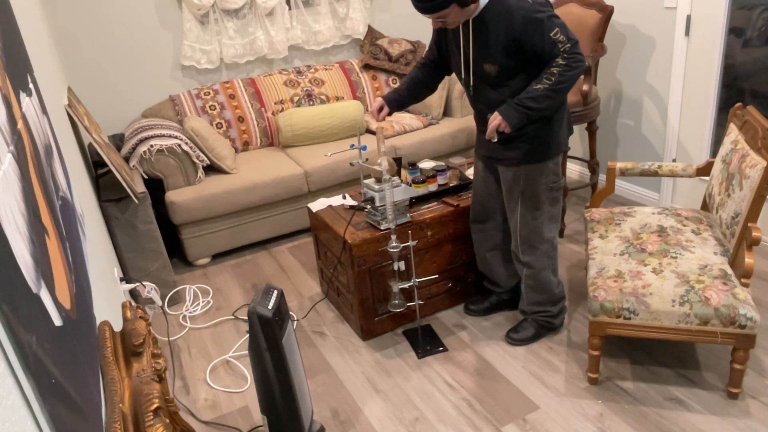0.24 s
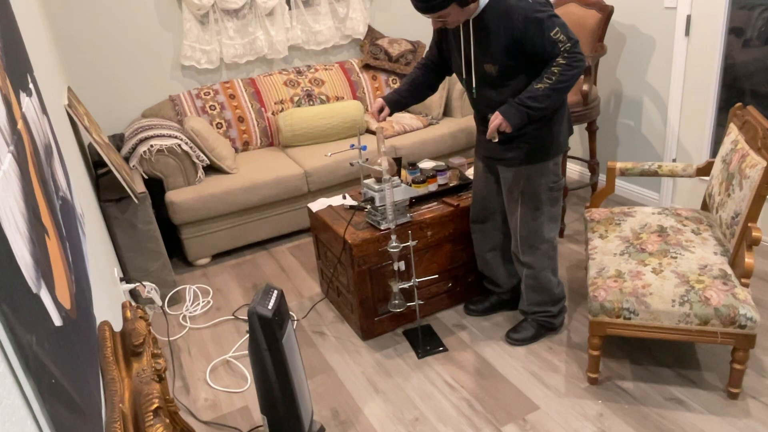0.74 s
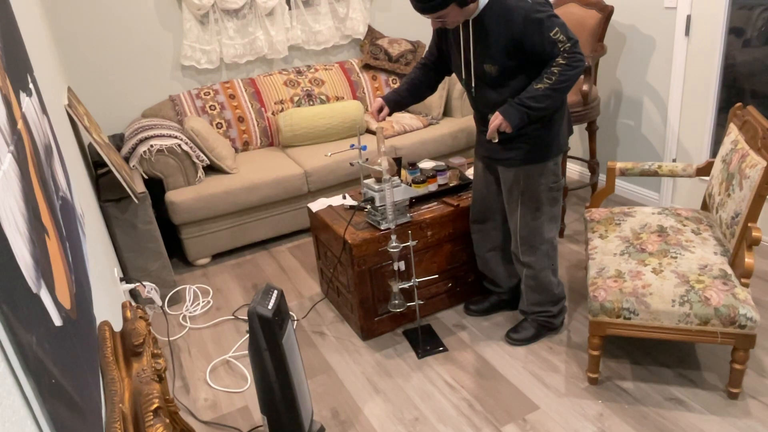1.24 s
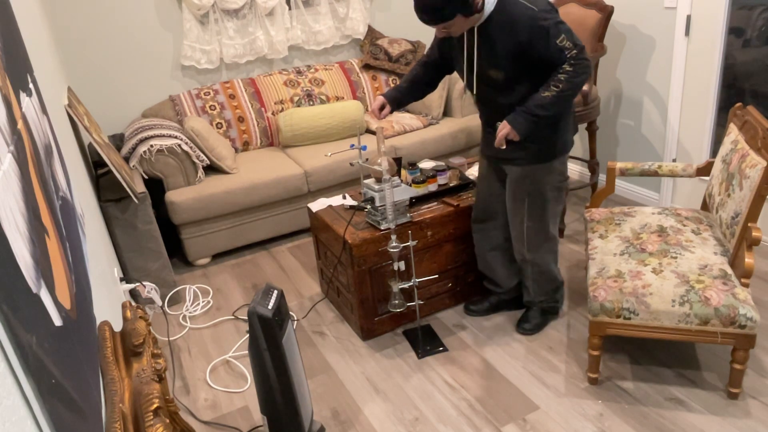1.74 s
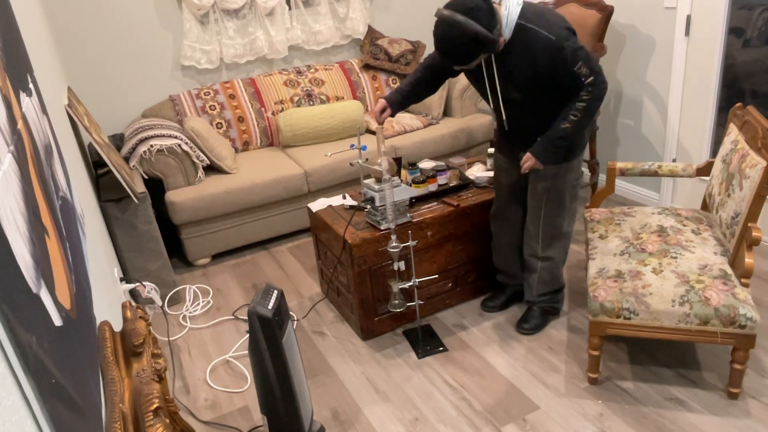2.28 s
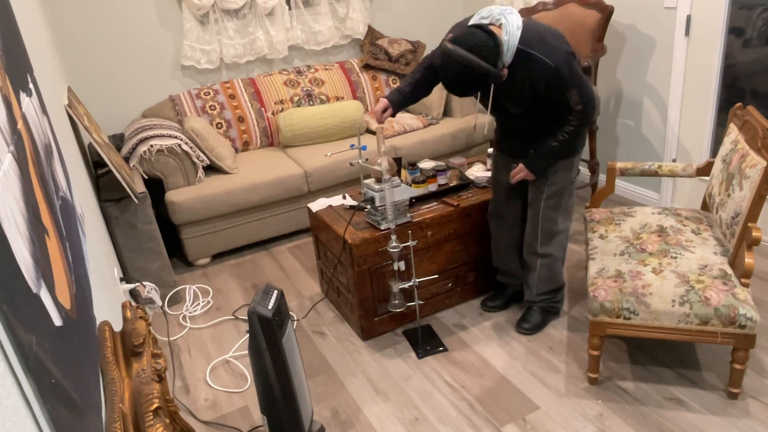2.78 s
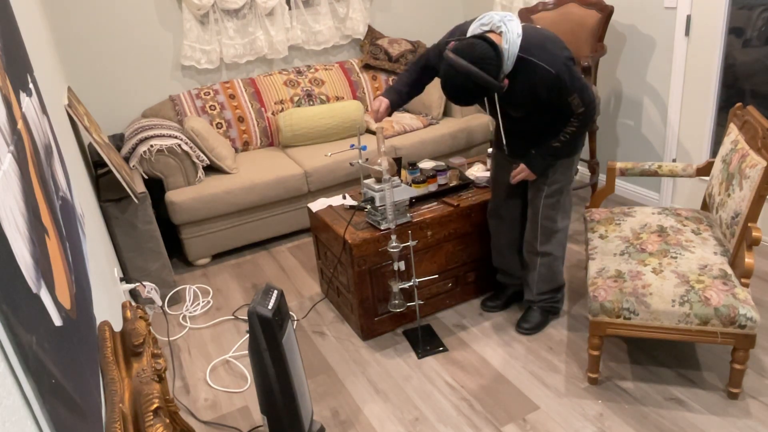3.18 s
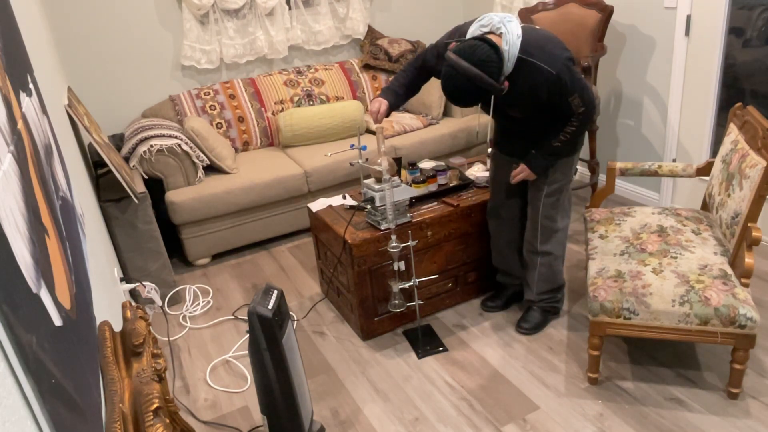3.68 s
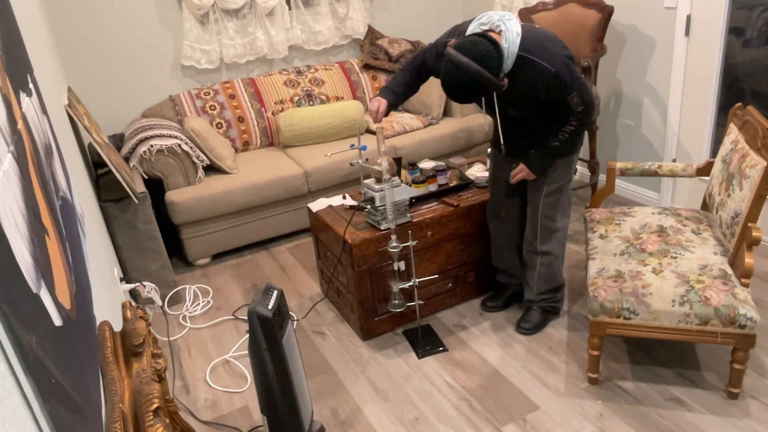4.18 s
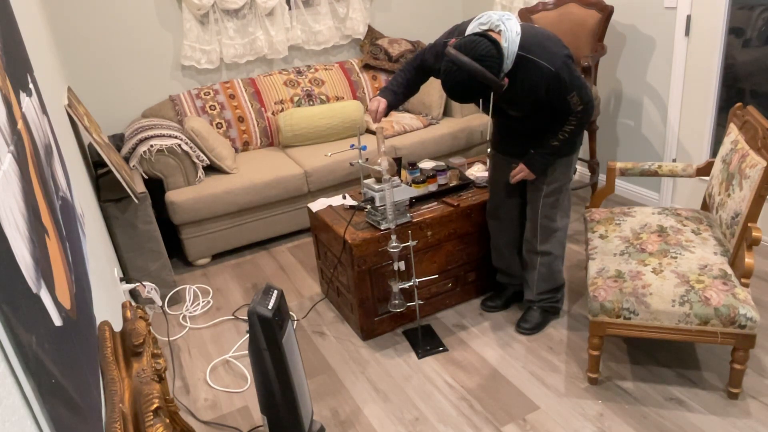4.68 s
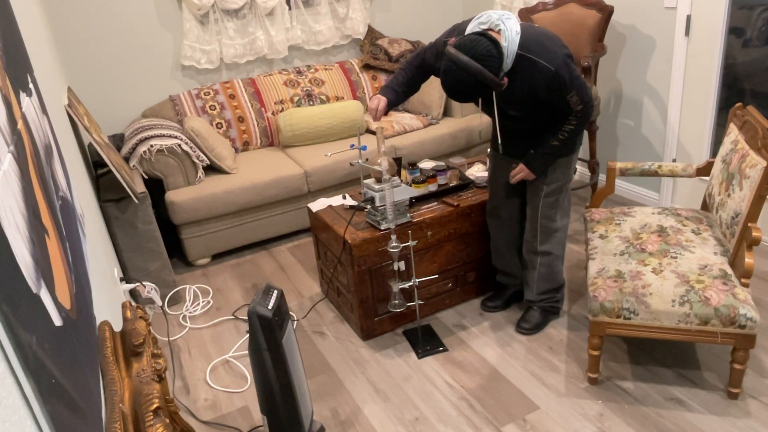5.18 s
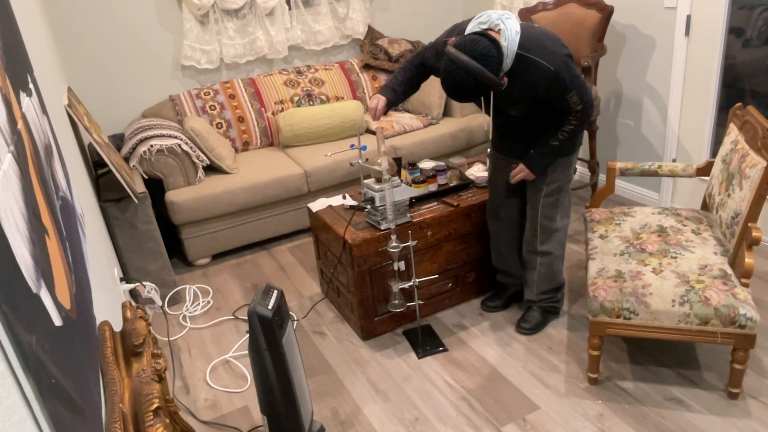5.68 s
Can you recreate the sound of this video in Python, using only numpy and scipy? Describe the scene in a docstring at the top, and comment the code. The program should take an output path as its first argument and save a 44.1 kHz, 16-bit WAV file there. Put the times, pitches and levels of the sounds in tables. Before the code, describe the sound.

A small furnished room picked up in stereo by a phone, with short reverberation, low rumble and faint hiss. From 0 to 1.5 s, clamped glassware gives irregular tiny ticks, some dry and sharp, some chirping, over faint scratchy creaking. A low motor hum near 77 Hz is weak at first, grows from about 1 s and is strongest around 1.5 s, then rises and falls unevenly, with a buzzier edge around 2 to 3 s. At 1.5 and 1.65 s a shoe scuffs briefly, with a soft low thud at 1.7 s; a longer, louder gritty slide swells to about 2.1 s and dies away. Ticks resume at 2.3 s and crowd together from 3 to 3.5 s. From 3.7 to 4.8 s, about nine uneven stir-bar knocks ring the flask, bright, hard and very short, with small rattles; the strongest is near 4.2 s. A faint pulsing whirr lingers. Sparse clicks and light creaking continue to 5.9 s.

```python
"""A magnetic stir bar knocks against a glass flask in a small living room: each blow rings the glass modes.
The glassware ticks and creeps in its clamp by stick-slip, which rings the clamp's modes.
Feet beside it shift: three short scuffs of filtered noise with grit, and a soft low thud.
A motor hums in multiples of its turning rate, swelling and fading; the stirrer whirrs faintly as noise
through two resonances. Rumble and hiss lie beneath, and two phone microphone ports pick it all up."""
import sys
import numpy as np
from scipy import signal
from scipy.fft import rfft, irfft, next_fast_len
from scipy.io import wavfile

SR = 44100
rng = np.random.default_rng(int(sys.argv[2]) if len(sys.argv) > 2 else 0)


def put_to_file(sound):
    """Save the sound as 16-bit audio at rate SR, in the file named by the first command-line argument."""
    columns = np.atleast_2d(sound).T  # one column per channel
    safe = np.clip(columns, -1, 1)
    whole_steps = np.round(safe * 32767)
    wavfile.write(sys.argv[1], SR, whole_steps.astype(np.int16))


N = 261697
TIME = np.arange(N) / SR  # s

# Levels are relative: gains in the functions and the ports may shift them.
# Stir bar blows on the flask: [t/s, strength/dB, favoured f/Hz, emphasis/dB, second f/Hz,
# its emphasis or damping/dB, each bounce against the last/dB, clamp rattle level/dB]
FLASK_KNOCKS = [(3.711, -5.5, 5270, 9, 3580, -5.5, -33, -69),
                (3.8038, -4, 3750, -24, 10300, -10, -14, -67.5),
                (3.9592, -5, 2750, 2.5, 9500, 2.5, -8, -61), (4.2139, 0.5, 2670, 14.5, 3440, 3, -13, -64.5),
                (4.512, -3, 3000, -2.5, 14300, 11, -7, -59), (4.53, -8, 4670, 11.5, 10400, -13, -14, -66.5),
                (4.67, -7, 7400, 12, 10600, -4.5, -8, -67.5), (4.681, -5.5, 10400, -9, 5900, 0, -22, -63.5),
                (4.803, -1, 4440, 3, 2970, 5, -13, -63.5)]
# Modes of the flask: [f/Hz, level/dB, t60/s]
FLASK_MODES = [(2200, -9, 0.018), (2421, -1, 0.037), (2852, -4, 0.062), (2933, -8.5, 0.025),
               (3580, -17.5, 0.034), (3975, -8, 0.039), (4270, 2.5, 0.043), (4335, 2, 0.085),
               (4490, -11, .018), (4900, -5, 0.023), (5820, -13.5, 0.028), (7080, -1.5, 0.06),
               (7430, -8, 0.015), (8400, -0.5, 0.0044), (10400, 9.5, 0.033), (14700, -20, .012),
               (14240, -7.5, 0.039)]
LONGEST_BOUNCE_S = 0.013
# A place of contact favours the modes within about this many octaves
CONTACT_OCTAVES = 0.21

# Slips of the glassware in its clamp: [t/s, strength/dB, favoured f/Hz, emphasis/dB, slip decay/s]
CLAMP_TICKS = [(.18, -6, 3770, 21, 0.022), (.216, -6.5, 3770, 1, 0.01), (.279, 1, 11100, 14.5, 0.0015),
               (.43, -13, 5500, 22, 0.0022), (.461, -18, 5400, 25, 0.0024), (.508, -5, 3470, 17, 0.0085),
               (.688, -16.5, 6060, 29, 0.0014), (.832, -8.5, 620, 35, 0.0026),
               (.937, -16, 5650, 24, 0.0065), (1.029, -2.5, 10350, 19.5, 0.0067),
               (1.095, -12, 3830, 22, .012), (1.21, -16, 3900, 26, 0.012), (1.265, -2, 3440, 23, 0.024),
               (1.36, 3.5, 5055, 15, 0.001), (1.41, -3.5, 8240, 8, 0.014), (1.498, -3, 5850, 10, 0.00091),
               (2.295, 3, 7430, 8, 0.0038), (2.437, -20.5, 5700, 9, .003), (2.562, -3.5, 2000, 1.5, 0.021),
               (2.755, -15.5, 5260, 21, 0.0043), (2.9, -13.5, 6160, 26, .02), (2.99, -8, 5487, 12, .001),
               (3.018, -11.5, 5600, 21, 0.00087), (3.04, -7, 2900, 10, .02), (3.09, -7, 7800, 9, 0.027),
               (3.235, -19, 5840, 21, 0.0018), (3.313, -5, 3420, 14, 0.0065),
               (3.347, -3.5, 3630, 21, 0.009), (3.352, -4, 7800, 23, 0.0076), (3.411, -5.5, 7800, 20, 0.01),
               (3.484, -5.5, 3680, 12, 0.0022), (3.504, 5, 2280, 17.5, 0.02), (3.804, 5, 12500, 20, 0.0012),
               (3.9, -11.5, 5340, 26, .002), (4.0605, 4.5, 11400, 11, 0.018),
               (4.1665, -1, 7800, 10, 0.0042), (4.423, -7, 4030, 13, .002), (4.683, 4, 13500, 24, 0.0017),
               (5.094, -2, 4760, 1, .003), (5.514, -10, 5180, 31, 0.0039), (5.848, -5.5, 4100, 3.5, 0.0016)]
# Modes of the clamped glassware: [f/Hz, level/dB, t60/s]
CLAMP_MODES = [(945.5, -2, 0.016), (2330, 2.5, 0.014), (2865, 3, 0.072), (3640, -11, 0.044),
               (3976, -5.5, 0.059), (4240, -9.5, 0.064), (4900, -9, 0.031), (5590, -6, 0.01),
               (7685, -6.5, 0.013), (10800, -14, 0.024), (12150, -15, .02), (14700, -20.5, .008)]
TICK_CRACK_DB = -10  # against a mode of 0 dB
SLIPS_PER_S = 520  # mean rate of the small slips in a run
# Spells of creep in the clamp: [centre t/s, width/s, level/dB]
CREEP_SPELLS = [(0.317, 0.46, -69), (1.593, 0.53, -69.5), (2.27, 0.14, -71.5), (3.512, 0.13, -71.5),
                (0.95, 0.043, -68), (5.097, 0.04, -70.5), (5.263, 0.23, -71), (5.556, 0.034, -73),
                (5.847, 0.3, -70)]
CREEP_REST_DB = -79
# Rattle after a knock: delay to its peak, and width
RATTLE_DELAY_S, RATTLE_WIDTH_S = 0.034, 0.041
# Colour of the creep: [f/Hz, level/dB]
CREEP_COLOUR = [(300, -14.5), (700, 5.5), (1500, 8.5), (2400, -4.5), (4000, -16.5), (6000, -18.0),
                (8000, -17), (12000, -26.5)]

# Slides of the sole: [start t/s, attack/s, hold/s, level/dB, favoured f/Hz, emphasis/dB]
SOLE_SLIDES = [(1.492, 0.064, 0.012, -57, 2170, 5.5), (1.648, 0.028, 0.042, -53.5, 1400, 1),
               (1.951, 0.17, 0.04, -46.5, 4300, 0.5)]
# Spectrum of the rubbing sole: [f/Hz, level/dB]
SOLE_SPECTRUM = [(200, -25), (400, -12), (700, 2), (1200, -4.5), (1800, 0), (2500, 1), (3300, 2), (4300, 3),
                 (6000, -0.5), (8000, 1.5), (10000, -11), (12500, -8.5), (15500, -16)]
# Resonances of the sliding sole: [f/Hz, width/Hz, level/dB]
SOLE_RESONANCES = [(2300, 320, 3.5), (3630, 170, -2), (4640, 400, -4.5)]
SCUFF_T60_S, SCUFF_CURVE = 0.27, 1.83  # decay, and exponent of the rise
GRIT_PER_S, GRIT_DB = 260, -6  # mean grain rate, and level against the rubbing noise
# Spectrum of the footfall: [f/Hz, level/dB]
STEP_SPECTRUM = [(40, -5.5), (110, 15), (250, -23), (450, -12.5), (900, -19.5), (2000, -56)]
STEP_S, STEP_DB, STEP_T60_S = 1.712, -34, 0.35

# Turning rate of the motor: [t/s, f/Hz]
MOTOR_SPEED = [(0, 37.88), (1, 38.34), (1.6, 38.61), (2.3, 38.75), (2.8, 40.19), (3.5, 38.59), (4.2, 38.28),
               (4.8, 37.85), (5.93, 37.67)]
# Hum at twice the turning rate: [t/s, level/dB]
HUM_LEVEL = [(0.0, -53), (0.2, -59), (0.87, -43.5), (0.96, -54), (1.03, -37.5), (1.2, -39.5), (1.26, -34),
             (1.52, -29), (1.8, -35), (2.5, -42.5), (2.8, -40.5), (3.0, -50.5), (3.41, -44), (3.77, -57),
             (3.96, -39), (4.19, -36), (4.35, -46.5), (4.44, -41.5), (4.72, -53.5), (5.25, -42),
             (5.93, -45)]
# Buzz in the even multiples from the 4th: [t/s, level/dB before each share]
BUZZ_LEVEL = [(0.0, -81), (0.78, -73), (0.98, -62), (1.6, -56.5), (1.88, -46), (2.13, -50), (2.2, -47.5),
              (2.44, -41), (3.04, -58), (3.35, -52), (3.68, -50), (3.85, -67.5), (3.97, -57.5),
              (4.37, -52.5), (4.48, -60), (4.62, -56), (5.35, -68.5)]
# Rotor wobble in the odd multiples from the 3rd: [t/s, level/dB before each share]
WOBBLE_LEVEL = [(0, -60.5), (1.1, -54), (1.6, -41.5), (2.15, -47.5), (2.9, -49.5), (3.45, -60),
                (5.93, -56.5)]
# Shares of the 3rd to 6th multiple, against the wobble (odd) or the buzz (even): [level/dB]
MULTIPLE_SHARES = [-2.5, -1, -16.5, -12.5]
# Whirr of the stirrer: [t/s, level/dB]
WHIRR_LEVEL = [(0, -74.5), (1.2, -71.5), (2.7, -79), (3.5, -71.5), (4.3, -67), (5.93, -70.5)]
# Resonances of the stirrer's case: [f/Hz, width/Hz, level/dB, trend/(dB/s), share of the swell]
CASE_RESONANCES = [(563, 15, 6.5, -0.55, 0.77), (948.4, 35, -9, 1, 1)]
# Drive swell: turns per s, t/s of a peak, and rise or fall about the mean at a share of 1
STIR_TURNS_PER_S, STIR_PEAK_S, STIR_SWELL_DB = 3.82, 4.04, 4.5

# Spectrum of the room's rumble and hiss: [f/Hz, level/dB]
AIR_SPECTRUM = [(20, -28), (36, -25), (56, 8), (75, 4), (100, 3), (135, -17), (180, -5.5), (300, -23),
                (480, -20), (800, -28), (1300, -44), (2500, -38.5), (5000, -62.5), (15000, -68)]
# Swell of the low-middle room noise: [t/s, level/dB]
LOW_MIDDLE_LEVEL = [(0, -61.5), (1.0, -62), (1.85, -56.5), (2.75, -59), (3.1, -64), (4.5, -66.5),
                    (5.4, -70.5)]
# Spectrum of the low-middle room noise: [f/Hz, level/dB]
LOW_MIDDLE_SPECTRUM = [(60, -26.0), (120, 13.5), (200, -2), (300, 2.5), (450, -15.0), (900, -22.5), (3000, -49)]
ROOM_T60_S, ROOM_TOP_T60_S = 0.37, 0.21  # below and above 6500 Hz
DIRECT_DB = -4  # direct sound against the whole echo tail
# Phase by which the left port leads: [f/Hz, phase/rad]
PORT_PHASE_LEAD = [(55, 0), (150, .15), (430, 0.6), (550, 1.6), (700, 3.2), (950, 6.4), (1400, 6.3),
                   (2400, 3.6), (3400, .3), (4300, -.6), (6200, -.8), (8300, -2.45), (10450, -3.65),
                   (11500, -3.9), (13200, -6.28)]
# Part that the ports do not share: [f/Hz, level/dB]
PORT_UNSHARED = [(60, -26), (125, -17.5), (250, -12), (500, -3), (1000, -2), (2200, -3), (4000, -6.5),
                 (8000, -35.5)]
# Left port against the right: [f/Hz, level difference/dB]
PORT_LEVELS = [(130, 0.7), (250, -0.3), (500, 3.5), (1000, 3), (2200, 0), (4000, -0.4)]
TOP_HZ = 15900


def knocks(gain_db, crack_db, scatter_db, detune):
    """Repeated impact: the bar hits the flask and bounces twice within milliseconds, ever weaker."""
    track = np.zeros(N)
    for s, strength_db, hz, emphasis_db, second_hz, second_db, rebound_db, _ in FLASK_KNOCKS:
        for bounce in range(3):
            blow = strike(FLASK_MODES, crack_db, scatter_db, detune)
            blow = contact(blow, hz, emphasis_db)
            blow = contact(blow, second_hz, second_db)
            add(track, blow * undb(gain_db + strength_db + bounce * rebound_db), s)
            s += LONGEST_BOUNCE_S * rng.uniform(.6, 1)
    return track


def strike(modes, crack_db, scatter_db, detune):
    """Modal superposition: a blow is a short noise crack plus exponentially decaying modes."""
    t = TIME[:SR // 5]
    hz, db, t60 = np.transpose(modes)[:, :, None]
    size, shift, phase = rng.standard_normal((3, len(modes), 1))
    rings = np.sin(2 * np.pi * (hz * (1 + detune * shift) * t + phase)) * decay(t, t60)
    rings /= np.sqrt(np.sum(rings ** 2, axis=1, keepdims=True))  # equal energy before their levels
    burst = rng.standard_normal(len(t)) * np.exp(-t / 0.0012)
    crack = bandpass(burst, 600, 8500)
    crack = undb(crack_db) * crack / np.linalg.norm(crack)
    return np.sum(rings * undb(db + scatter_db * size), axis=0) + crack


def contact(x, hz, emphasis_db):
    """Mode shapes: the place of contact boosts or damps the modes near one frequency."""
    bands = np.geomspace(500, 16000, 61)
    octaves = np.log2(bands / hz)
    bump_db = emphasis_db * np.exp(-.5 * (octaves / CONTACT_OCTAVES) ** 2)
    padding = next_fast_len(len(x) + SR // 20) - len(x)
    return colour(np.pad(x, (0, padding)), np.transpose([bands, bump_db]))[:len(x)]


def ticks(table, gain_db, scatter_db, detune, run_db):
    """Stick-slip: the glass lets go with a tick, and a run of smaller slips chirps in the same modes."""
    track, t = np.zeros(N), TIME[:SR // 10]
    for s, strength_db, hz, emphasis_db, slip_s in table:
        slips = undb(run_db) * rng.standard_normal(len(t))
        slips *= rng.random(len(t)) < SLIPS_PER_S / SR
        slips *= np.exp(-t / slip_s)
        slips[0] = 1
        ring = signal.fftconvolve(slips, strike(CLAMP_MODES, TICK_CRACK_DB, scatter_db, detune))
        ring = contact(ring, hz, emphasis_db)
        add(track, ring / np.linalg.norm(ring) * undb(gain_db + strength_db), s)
    return track


def small_ticks(db, spread_db, slip_s, count):
    """Chance contacts: rows for ticks at random moments, strengths and places, 3000 to 6000 Hz."""
    when, size, place = rng.random((count, 3)).T
    strength_db, hz = db + spread_db * size, 3000 * 2 ** place
    return np.transpose([when * N / SR, strength_db, hz, np.full(count, 20), np.full(count, slip_s)])


def rubbing(gain_db, ring_db, spread_db, count):
    """Stick-slip creep: many tiny slips ring now one mode, now another; each knock shakes loose more."""
    when, size = rng.random((count, 2)).T
    slips = np.zeros(N)
    slips[(when * N).astype(int)] = undb(spread_db * size) * rng.standard_normal(count)
    creep = undb(CREEP_REST_DB)
    rattles = [(s + RATTLE_DELAY_S, RATTLE_WIDTH_S, db) for s, *_, db in FLASK_KNOCKS]
    for s, width_s, db in CREEP_SPELLS + rattles:
        creep = np.hypot(creep, undb(db) * np.exp(-((TIME - s) / width_s) ** 2))
    slips = unit(slips) * creep * undb(gain_db)
    rings = 0
    for hz, db, _ in CLAMP_MODES:
        uneven = slips * undb(4.5 * walk(25))
        rings = rings + undb(db + ring_db) * resonate(uneven, hz, hz / 35)
    return colour(slips + rings, CREEP_COLOUR)


def scuffs(gain_db, ring_db):
    """Sliding friction: uneven rubbing noise rises, holds and decays; grit crackles, resonances come and go."""
    grain_db, flutter_db, patchy_db = 1.2, 0.9, 6.5
    rub = noise(SOLE_SPECTRUM)
    for hz, width, db in SOLE_RESONANCES:
        ring = resonate(noise(SOLE_SPECTRUM), hz, width)
        rub = rub + ring * undb(ring_db + db + patchy_db * walk(70))
    grains = rng.standard_normal(N) * (rng.random(N) < GRIT_PER_S / SR)
    rub = rub + undb(GRIT_DB) * unit(colour(room(grains), SOLE_SPECTRUM))
    out = 0
    for s, attack_s, hold_s, db, hz, emphasis_db in SOLE_SLIDES:
        rise = np.clip((TIME - s) / attack_s, 0, 1) ** SCUFF_CURVE
        fall = decay(np.maximum(TIME - s - attack_s - hold_s, 0), SCUFF_T60_S)
        slide = rub * undb(db) * rise * fall
        out = out + np.array([contact(part, hz, emphasis_db) for part in slide])
    return out * undb(gain_db + grain_db * walk(420) + flutter_db * walk(60))


def step():
    """Soft impact: the foot comes down as low noise with a fast rise and an exponential decay."""
    age = np.maximum(TIME - STEP_S, 0)
    rise = 1 - np.exp(-age / 0.0048)
    return noise(STEP_SPECTRUM) * undb(STEP_DB) * rise * decay(age, STEP_T60_S)


def hum(hum_db, flutter_db):
    """Rotational harmonics: a hum at twice the turning rate, even multiples buzzing, odd ones from wobble."""
    turns = np.cumsum(curves(MOTOR_SPEED)[0]) / SR
    out = undb(curves(HUM_LEVEL)[0] + hum_db) * np.sin(2 * np.pi * (2 * turns + rng.random()))
    for k, share_db in enumerate(MULTIPLE_SHARES, 3):
        db = curves(WOBBLE_LEVEL if k % 2 else BUZZ_LEVEL)[0] + share_db + flutter_db * walk(14)
        out += undb(db) * np.sin(2 * np.pi * (k * turns + rng.random() + 0.079 * walk(10)))
    return np.sqrt(2) * out * np.array([[1], [0]])  # only in the part that the ports share


def whirr():
    """Forced resonance: noise from the drive excites two case modes that waver and swell once a turn."""
    drive = rng.standard_normal((2, N))
    swell_db = STIR_SWELL_DB * np.cos(2 * np.pi * STIR_TURNS_PER_S * (TIME - STIR_PEAK_S))
    out = 0
    for hz, width, db, trend, share in CASE_RESONANCES:
        level_db = db + trend * TIME + share * swell_db + 2.2 * walk(14)
        out = out + undb(level_db) * resonate(drive, hz, width)
    out = bandpass(out, 400, 1200)
    return unit(out) * undb(curves(WHIRR_LEVEL)[0])


def background(rumble_db, low_db):
    """Stationary noise: wavering room rumble and hiss, with a slowly swelling low middle."""
    waver_db = 1.3 * walk(12)
    air = noise(AIR_SPECTRUM) * undb(rumble_db + waver_db)
    body = noise(LOW_MIDDLE_SPECTRUM) * undb(curves(LOW_MIDDLE_LEVEL)[0] + low_db)
    return air + body


def room(x):
    """Reverberation: direct sound, then dense echoes, a few stronger off the far wall; treble dies first."""
    t = TIME[:SR // 2]
    far_wall = 0.1 * np.exp(-((t - .026) / 0.011) ** 2)
    echoes = rng.standard_normal((2, len(t))) * (1 + far_wall)
    low, high = (signal.sosfilt(signal.butter(3, 6500, kind, fs=SR, output="sos"), echoes)
                 for kind in ("low", "high"))
    tail = low * decay(t, ROOM_T60_S) + high * decay(t, ROOM_TOP_T60_S)
    tail /= np.linalg.norm(tail[0])
    tail[0, 0] += undb(DIRECT_DB)
    return signal.fftconvolve(x[None], tail, axes=1)[:, :N]


def ports(field):
    """Interchannel coherence: shared plus or minus unshared sound, with phase and level differences over f."""
    size = next_fast_len(N + SR // 10)
    shared, apart = rfft(field, size)
    sign = np.array([[1], [-1]])  # left, right
    pair = shared + sign * apart * undb(over_hz(PORT_UNSHARED, size))
    phase = np.exp(.5j * sign * over_hz(PORT_PHASE_LEAD, size))
    balance = undb(sign * over_hz(PORT_LEVELS, size) / 2)
    return irfft(pair * (phase * balance), size)[:, :N]


def undb(db):
    """Level law: decibels to amplitude gain."""
    return 10 ** (np.asarray(db) / 20)


def unit(x):
    """Normalisation: scale to rms 1."""
    return x / np.sqrt(np.mean(x ** 2))


def decay(t, t60):
    """Exponential decay: the level falls by 60 dB in t60."""
    return np.exp(-np.log(1000) * t / t60)


def resonate(x, hz, width):
    """Simple resonator: a peak at hz with the given bandwidth."""
    return signal.lfilter(*signal.iirpeak(hz, hz / width, fs=SR), x)


def bandpass(x, low_hz, high_hz):
    """Band limitation: keep what lies between two frequencies."""
    return signal.sosfilt(signal.butter(2, [low_hz, high_hz], "band", fs=SR, output="sos"), x)


def curves(table):
    """Linear interpolation: the columns of a timed table at every sample."""
    s, *columns = np.transpose(table)
    return [np.interp(TIME, s, c) for c in columns]


def over_hz(points, size):
    """Logarithmic frequency scale: (f/Hz, value) points at the bins of a transform of this size."""
    hz, value = np.transpose(points)
    return np.interp(np.log(np.fft.rfftfreq(size, 1 / SR) + 1), np.log(hz), value)


def colour(x, points):
    """Spectral weighting: filter by (f/Hz, level/dB) points."""
    size = x.shape[-1]
    return irfft(rfft(x) * undb(over_hz(points, size)), size)


def noise(points):
    """Incoherent sources: two unrelated noises with one spectrum, rms 1."""
    white = rng.standard_normal((2, next_fast_len(N)))
    return unit(colour(white, points)[:, :N])


def walk(rate):
    """Random modulation: chance values, rate per second, joined by lines, with a spread near 1."""
    steps = rng.standard_normal(4096)
    return np.sqrt(3 / 2) * np.interp(TIME * rate, np.arange(len(steps)), steps)


def add(track, sound, s):
    """Superposition: mix a sound into the track at time s."""
    start = max(int(s * SR), 0)
    part = sound[:max(N - start, 0)]
    track[start:start + len(part)] += part


def scene():
    """Superposition: glass heard through the room, with the feet, the motor and the room noise."""
    glass = knocks(gain_db=-29.0, crack_db=-6.5, scatter_db=2.5, detune=0.0014)
    faint = small_ticks(db=-24.5, spread_db=6.5, slip_s=0.0041, count=55)
    contacts = np.vstack([CLAMP_TICKS, faint])
    glass += ticks(contacts, gain_db=-34.5, scatter_db=2.5, detune=0.015, run_db=-3)
    glass += rubbing(gain_db=2.0, ring_db=8.0, spread_db=23.0, count=2200)
    feet = scuffs(gain_db=-0.26, ring_db=-3.5) + step()
    motor = hum(hum_db=-0.2, flutter_db=2.5) + whirr()
    return ports(room(glass) + feet + motor + background(rumble_db=-50.0, low_db=3.5))


def record(dry):
    """Band limitation: the phone cuts the top with a steep elliptic low-pass."""
    return signal.sosfilt(signal.ellip(10, .2, 70, TOP_HZ, fs=SR, output="sos"), dry)


dry = scene()
out = record(dry)
put_to_file(out)
```